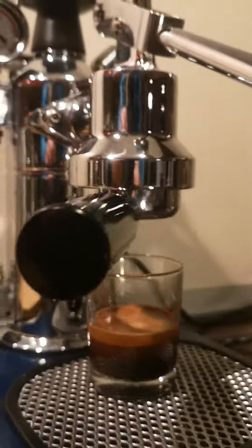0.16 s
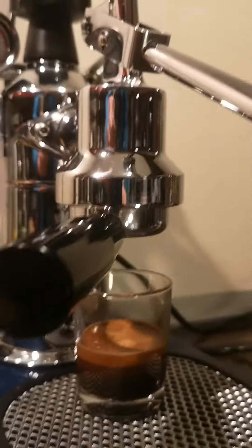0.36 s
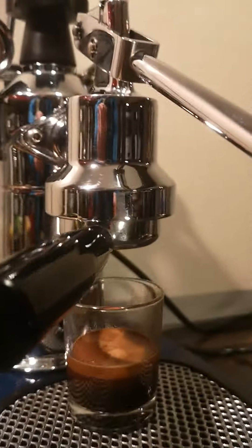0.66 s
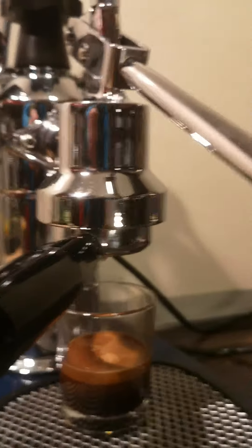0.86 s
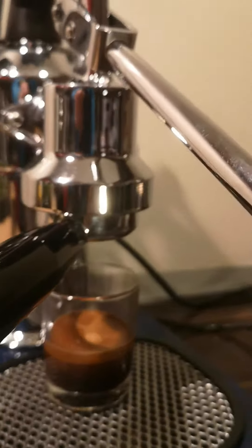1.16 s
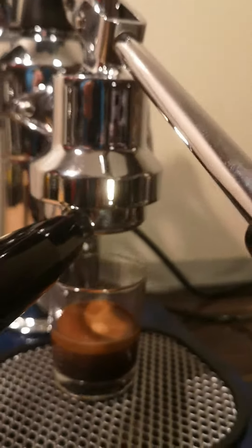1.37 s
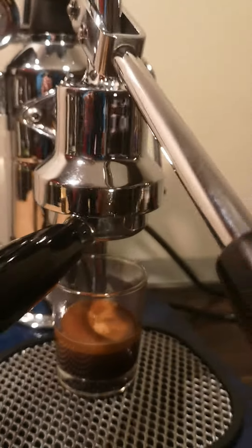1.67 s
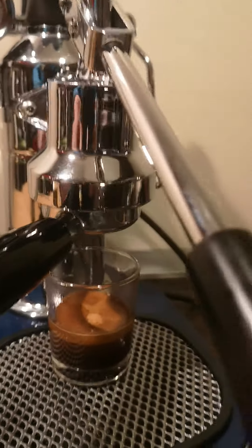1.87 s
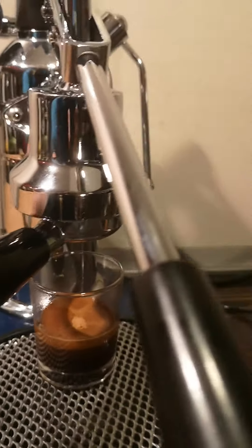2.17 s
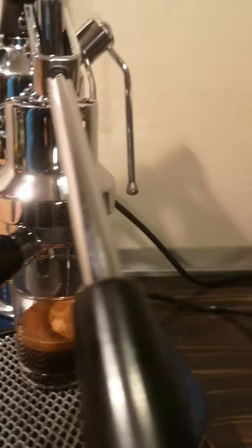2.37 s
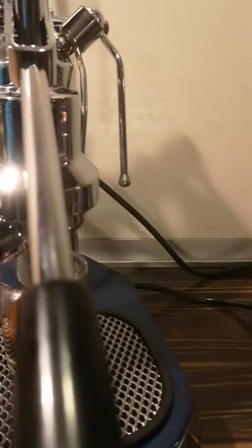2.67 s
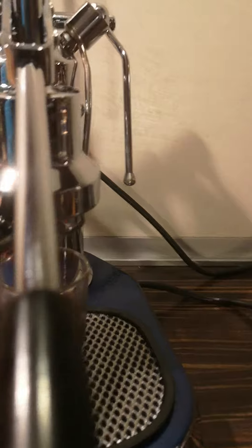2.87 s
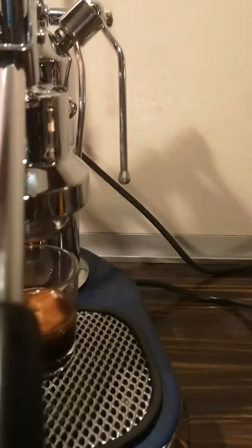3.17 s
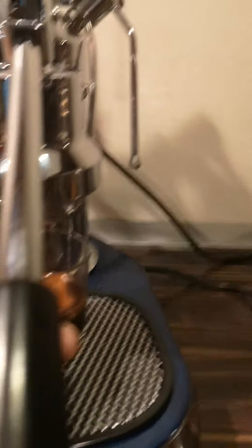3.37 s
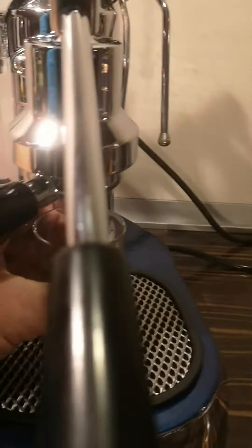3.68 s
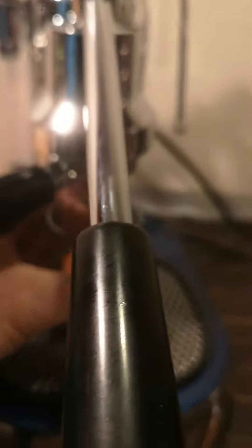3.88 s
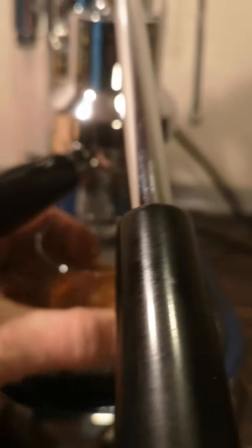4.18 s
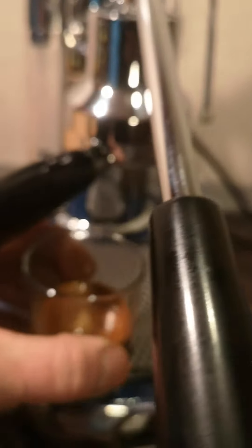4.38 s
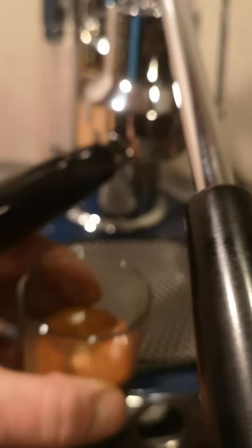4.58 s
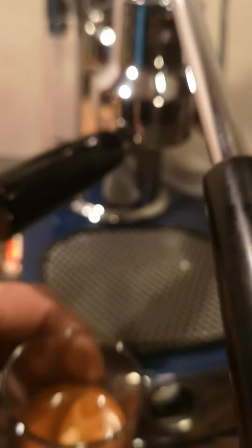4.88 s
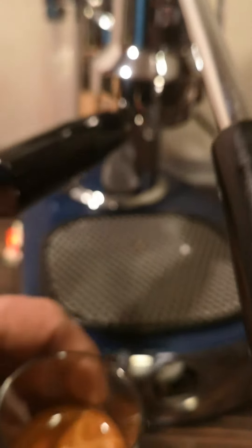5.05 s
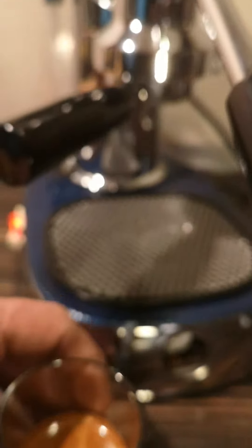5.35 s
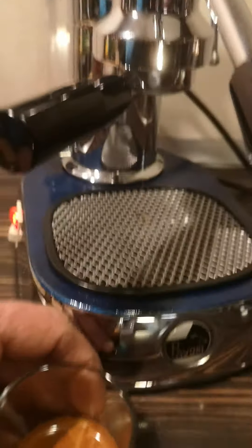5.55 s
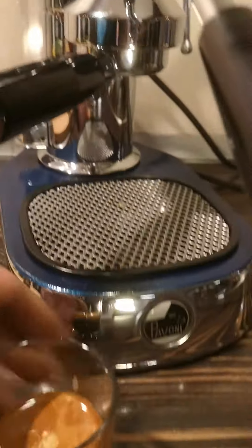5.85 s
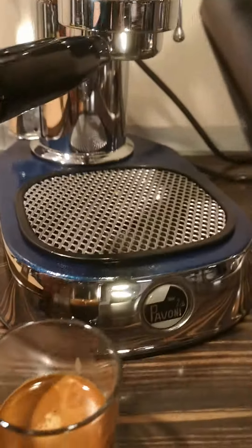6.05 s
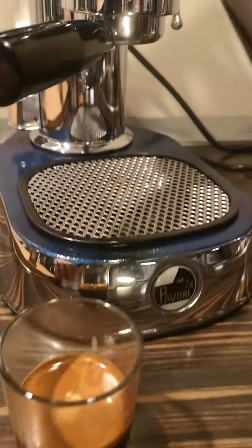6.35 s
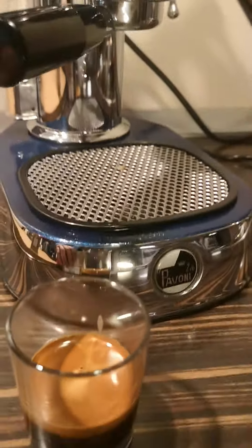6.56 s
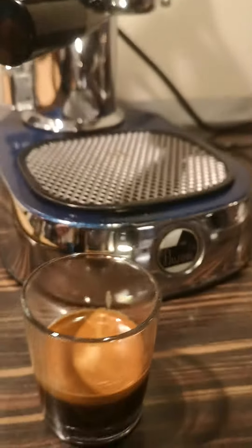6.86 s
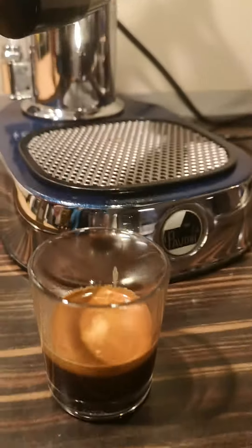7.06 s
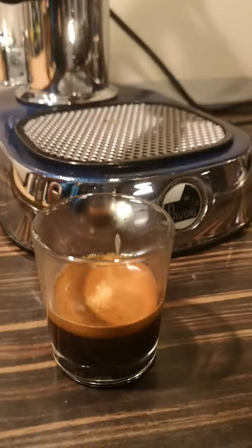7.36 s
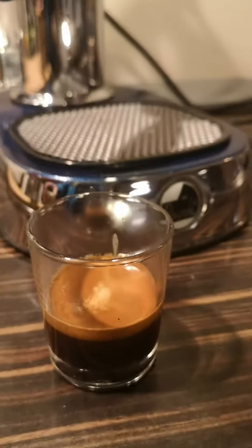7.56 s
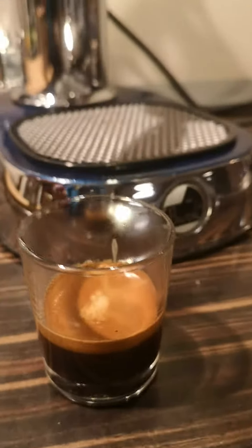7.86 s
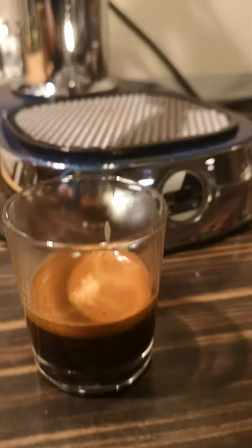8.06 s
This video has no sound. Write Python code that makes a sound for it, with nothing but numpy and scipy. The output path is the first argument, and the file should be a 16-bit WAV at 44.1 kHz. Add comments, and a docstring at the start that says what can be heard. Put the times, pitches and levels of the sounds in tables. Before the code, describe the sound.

Close handling ticks in a quiet room, a sleeve swish and sharp metallic snap, then a glass landing on wood with dull bumps after.

```python
"""Espresso glass set down on a wooden table

A small quiet room, heard through a phone's left and right microphone ports, with fingers close to the left one.
Fingers slide and tap on the case as filtered noise and short cracks; a sleeve swishes as hiss shaped by arm speed.
Metal snaps and small things click as the glass leaves a lever machine's metal drip tray: cracks, rings, low thuds.
The glass lands with a double knock over decaying table modes; a dry tick and dull bumps follow as the hand lets go."""
import sys
import numpy as np
from scipy import signal
from scipy.fft import rfft, irfft
from scipy.io import wavfile

SR = 44100
rng = np.random.default_rng(int(sys.argv[2]) if len(sys.argv) > 2 else 0)


def transcribe(signal):
    """Save signal, clipped to [-1, 1], as a 16-bit WAV file at the path in sys.argv[1]."""
    frames = np.atleast_2d(signal).T
    limited = np.clip(frames, -1, 1)
    pcm = np.round(limited * 32767).astype(np.int16)
    wavfile.write(sys.argv[1], SR, pcm)


N = 362618
T = np.arange(N) / SR
RING = T[:int(.6 * SR)]  # time axis of one short event, s


def undb(db):
    """Decibels to gain."""
    return 10 ** (np.asarray(db) / 20)


def unit(x):
    """Scale to rms 1."""
    return x / np.sqrt(np.mean(x ** 2))


def peak(x):
    """Scale to peak 1."""
    return x / np.abs(x).max()


def pan(db):
    """Left and right gains for a level difference, left minus right."""
    return undb(np.array([[db], [-db]]) / 2)


def add(out, s, x):
    """Mix a sound in at time s."""
    start = int(s * SR)
    x = x[..., max(-start, 0):N - start]
    first = max(start, 0)
    out[:, first:first + x.shape[-1]] += x


def at_freq(points, hz):
    """Read (Hz, value) points on a log-frequency axis."""
    f, value = np.transpose(points)
    return np.interp(np.log(np.maximum(hz, 1)), np.log(f), value)


def colour(x, points, tilt_db=0):
    """Minimum-phase filter of unit power gain through (Hz, dB) points, tilted per octave above 1 kHz."""
    size = 4096
    hz = np.arange(size // 2 + 1) * SR / size
    tilt = tilt_db * np.log2(np.maximum(hz, 1000))
    gain = unit(undb(at_freq(points, hz) + tilt))
    # folding the cepstrum onto positive times makes the filter causal
    cepstrum = irfft(np.log(gain))
    cepstrum[1:size // 2] *= 2
    cepstrum[size // 2 + 1:] = 0
    impulse = irfft(np.exp(rfft(cepstrum)))
    return signal.fftconvolve(np.atleast_2d(x), impulse[None], axes=1)[:, :x.shape[-1]]


def resonate(x, hz, q):
    """Two-pole resonance, gain 1 at its centre."""
    return signal.lfilter(*signal.iirpeak(hz, q, SR), x)


def fade(t60):
    """Exponential decay by 60 dB in t60 seconds."""
    return np.exp(-np.log(1000) * RING / t60)


def ring(modes):
    """Sum of decaying sines from (Hz, dB, t60 s) rows."""
    return sum(undb(db) * fade(t60) * np.sin(2 * np.pi * hz * RING) for hz, db, t60 in modes)


def soften(x, ms):
    """A contact that lasts longer excites less treble: smooth with a bell-shaped push."""
    push = np.exp(-.5 * (RING[:2048] * 4000 / ms - 2) ** 2)
    return signal.fftconvolve(np.atleast_2d(x), push[None] / push.sum(), axes=1)[:, :len(RING)]


def crack(t60, scatter_db, lag):
    """One impulse, reaching the left port lag s later, plus decaying scatter that differs at the two ports."""
    scatter = rng.standard_normal((2, len(RING))) * fade(t60)
    out = undb(scatter_db) * scatter / np.linalg.norm(scatter, axis=1, keepdims=True)
    out[0, int(max(lag, 0) * SR)] += 1
    out[1, int(max(-lag, 0) * SR)] += 1
    return out


# Small quiet room, how long each band lingers: freq_hz [Hz], t60_s [s]
ROOM_DECAY = [(100, 0.83), (400, 0.48), (1200, 0.35), (4000, 0.33), (8000, .36), (15000, 0.32)]


def room(x, wet_db):
    """Add the diffuse tail of a small room; the bass is alike at both ports."""
    build_s, split_hz = .008, 350
    hz = np.fft.rfftfreq(len(RING), 1 / SR)
    mid, side = rfft(rng.standard_normal((2, len(RING))))
    field = mid + np.array([[1], [-1]]) * side * np.minimum(hz / split_hz, 1)
    centres, t60s = np.transpose(ROOM_DECAY)
    tail = 0
    for share, t60 in zip(np.eye(len(t60s)), t60s):
        band = field * at_freq(np.c_[centres, share], hz)
        tail = tail + irfft(band, len(RING)) * fade(t60)
    tail = tail * (1 - np.exp(-RING / build_s))
    tail = tail / np.linalg.norm(tail[0])
    return x + undb(wet_db) * signal.fftconvolve(x, tail, axes=1)[:, :N]


# Fingers sliding on the case by the left port: start_s [s], length_s [s], level_db [dB], speed [0-1]
STROKES = [(-.03, 0.14, -41.5, 0.79), (0.144, 0.11, -58.5, 0.97), (0.611, 0.094, -53, 0.03),
           (0.704, 0.063, -63, 0.3), (.825, 0.048, -64.5, 0), (0.963, 0.093, -51.5, 0.08),
           (1.059, .23, -45.5, 0), (1.25, 0.18, -44.5, 0), (1.413, 0.034, -52.5, 0.1),
           (1.538, 0.12, -53, 0.34)]
# Skin on the case at the lowest and highest speed: freq_hz [Hz], relative_db [dB]
SLOW_RUB = [(300, -10.5), (850, -15), (1250, -12.5), (2100, -4.5), (2650, 0.5), (3400, -10.5), (4600, -2),
            (5600, -10.5), (7300, 1), (9300, -15.5), (11000, -30), (15000, -35)]
FAST_RUB = [(300, -33), (1400, -14.5), (2200, -3.5), (2900, -2.5), (4000, 3), (7800, 1.5), (10000, -20),
            (15000, -28)]


def finger_slides():
    """Skin slips over the case in countless tiny catches, right beside the left port."""
    grain, grain_hz, pan_db = .23, 700, 15
    out = np.zeros((2, N))
    for s, length, db, speed in STROKES:
        count = int(length * SR)
        strengths = np.exp(grain * rng.standard_normal(len(RING)))
        stick = strengths[(RING * grain_hz).astype(int)]  # each catch keeps its own strength
        catches = (rng.standard_normal((2, len(RING))) * stick)[:, :count]
        slow, fast = colour(catches, SLOW_RUB), colour(catches, FAST_RUB)
        near, other = unit((1 - speed) * slow + speed * fast)
        # the body of the phone shades the far port
        far = colour(other, [(800, 2), (2200, -6.5), (7000, -24.5), (14000, -9)])[0]
        ports = np.array([near, undb(-pan_db) * unit(far)])
        add(out, s, ports * undb(db) * signal.windows.tukey(count, .6))
    return out


# Rumble of the hand around the phone: freq_hz [Hz], relative_db [dB]
GRIP_RUMBLE = [(20, 6.5), (45, 3.5), (90, -6), (170, -12), (300, -28.5), (700, -47.5), (3000, -59.5)]
# The phone shifts in the hand: time_s [s], rumble_db [dB], half_length_s [s]
SHIFTS = [(1.4, -43, .08), (1.73, -46.5, .13), (2.3, -63, .5), (2.96, -54, .035), (3.45, -57, .12),
          (3.9, -61, .12), (7.7, -68, 1.1)]
GRIP_REST_DB = -80  # a hand held still


def grip_rumble():
    """The holding hand shifts and shakes both ports alike; each shift swells and ebbs."""
    shake = undb(GRIP_REST_DB)
    for s, db, half_s in SHIFTS:
        shake = shake + undb(db) * np.exp(-((T - s) / half_s) ** 2)
    return unit(colour(rng.standard_normal(N), GRIP_RUMBLE)) * shake


# Room tone of the small quiet room: freq_hz [Hz], relative_db [dB]
HUSH = [(20, 4), (45, -1.5), (100, -15), (200, -21), (400, -26.5), (700, -32), (1200, -28.5), (2300, -26.5),
        (3800, -32.5), (6500, -33), (7700, -30.5), (8500, -39.5), (11000, -43.5), (15500, -44.5)]
HUSH_DB, HUSH_RISE_DB_PER_S = -63.6, .3


def room_tone():
    """Faint hiss whose colour wanders slowly at random, over a low murmur of air that both ports share."""
    split_hz, wander_db = 250, -.4
    mid, side = colour(rng.standard_normal((2, N)), HUSH)
    side = signal.sosfilt(signal.butter(1, split_hz, "high", fs=SR, output="sos"), side)
    hiss = unit(np.array([mid + side, mid - side]))
    for hz in np.geomspace(2000, 8000, num=5):
        wander = np.interp(T, np.linspace(0, T[-1], num=20), rng.standard_normal(20))
        hiss = hiss + (undb(wander_db * wander) - 1) * resonate(hiss, hz, 7.7)
    return hiss * undb(HUSH_DB + HUSH_RISE_DB_PER_S * T)


# The grip slips once in a run of catches
CREAK_S, CREAK_HZ, CREAK_THUMP_DB, CREAK_TICK_DB, CREAK_TICK_HZ = 1.361, 115, -27, -26, 1800
CREAK_GAP_S, CREAK_SLOWING, CREAK_FADE_DB_PER_S = .0105, 1.22, 170


def creak(count=7):
    """Catches of a slipping grip, ever further apart and weaker, as rows like the taps."""
    gaps = CREAK_GAP_S * CREAK_SLOWING ** np.arange(count - 1)
    rows = []
    for delay in np.r_[0, np.cumsum(gaps)]:
        loss = CREAK_FADE_DB_PER_S * delay
        rows.append((CREAK_S + delay, CREAK_THUMP_DB - loss, CREAK_TICK_DB - loss, CREAK_TICK_HZ))
    return rows


# Faint catches at random while the phone is turned
TURN_START_S, TURN_LENGTH_S = 1.17, .68
TURN_THUMP_DB, TURN_TICK_DB, TURN_SPREAD_DB = -45, -47, 3


def faint_catches(count=12):
    """Small chance catches of the turning grip, as rows like the taps."""
    rows = []
    for when, size in rng.random((count, 2)):
        thump_db = TURN_THUMP_DB + TURN_SPREAD_DB * (2 * size - 1)
        rows.append((TURN_START_S + TURN_LENGTH_S * when, thump_db, TURN_TICK_DB, CREAK_TICK_HZ))
    return rows


# The grip catches and taps on the case: time_s [s], thump_db [dB], tick_db [dB], tick_resonance_hz [Hz]
TAPS = [(0.202, -53, -29.5, 1400), (0.658, -55, -35, 2900), (0.922, -52, -24, 2900),
        (0.939, -44, -24, 1100), (1.215, -26, -13, 2700), (1.2509, -27, -9, 3200), (1.3, -36, -11.5, 4000),
        (1.340, -27, -34, 1700), (1.3453, -34, -19.5, 2400), (1.544, -35, -39, 7000),
        (1.576, -30.5, -44, 1700), (1.5842, -24.5, -26, 1900), (1.592, -33, -34, 1700),
        (1.621, -29, -34, 1600), (1.6429, -28, -28.5, 1650), (1.7356, -24, -30, 7000),
        (1.7618, -31, -33, 6500), (1.864, -38, -42, 2100), (1.9028, -33, -40.5, 1850),
        (5.856, -36.5, -47, 1000), (6.186, -30.5, -42.5, 2200), (6.507, -40, -54, 2400)]
# A tick at the near port: freq_hz [Hz], relative_db [dB]
TICK = [(200, 3.5), (450, 0), (700, -4), (1000, 2.5), (1500, -7), (2400, 2), (3700, -4), (5000, -12),
        (7500, -5.5), (10000, -21.5), (15000, -34.5)]
CASE_HZ = 155  # thump note of the taps and faint catches
FLEX_PER_TICK = .22  # dB of extra flexing for each dB by which the tick outweighs the thump


def case_taps():
    """Each catch ticks at the near port and thumps the whole case; the case also flexes, mostly under the finger."""
    thump_t60, thump_pan_db, contact_ms = .026, .4, .83
    far_db, resonance_db, q = -14, 6, 2.2
    flex_db, flex_hz, flex_t60, flex_far = -7, 325, .018, -.69  # the far port flexes in opposite phase
    out = np.zeros((2, N))
    for catches, hz in [(TAPS + faint_catches(), CASE_HZ), (creak(), CREAK_HZ)]:
        for s, thump_db, tick_db, tick_hz in catches:
            tick = colour(crack(.005, -7, -.0005), TICK)
            tick = peak(tick + undb(resonance_db) * resonate(tick, tick_hz, q))
            add(out, s, undb(tick_db) * tick * undb([[0], [far_db]]))
            flex_level = thump_db + flex_db + FLEX_PER_TICK * (tick_db - thump_db)
            flex = np.array([[1], [flex_far]]) * ring([(flex_hz, flex_level, flex_t60)])
            thump = pan(thump_pan_db) * ring([(hz, thump_db, thump_t60)])
            add(out, s, -soften(thump + flex, contact_ms))
    return room(out, -19)


SWISH_FALL = 1.5  # a movement dies away with this power of time


def swish(movement, spectrum, pan_db, resonances=()):
    """Fibres brush past each other as fast as the arm moves: it gathers speed, then coasts to rest."""
    grain = .31
    _, db, attack_s, release_s = movement
    t = T[:SR]
    fibres = rng.standard_normal((2, SR)) * np.exp(grain * rng.standard_normal(SR))
    hiss = unit(colour(fibres, spectrum))
    for hz, width, peak_db in resonances:
        band = resonate(rng.standard_normal(fibres.shape), hz, hz / width)
        hiss = hiss + undb(peak_db) * unit(band)
    rise = np.sin(np.pi / 2 * np.minimum(t / attack_s, 1)) ** 2
    coast = np.hypot(1, np.maximum(t - attack_s, 0) / release_s) ** SWISH_FALL
    speed = rise / coast
    return unit(hiss) * undb(db) * speed * (1 - t ** 2) * pan(pan_db)


# The arm reaching out: fastest_s [s], level_db [dB], attack_s [s], release_s [s]
REACH = (2.77, -44.8, .245, .068)
# The cuff brushing by: fastest_s [s], level_db [dB], attack_s [s], release_s [s]
CUFF_SWISHES = [(6.585, -56.5, .08, .035), (7.468, -53.5, .014, .06), (7.865, -51, .06, .026)]
# Cloth of arm and cuff: freq_hz [Hz], relative_db [dB]
ARM_CLOTH = [(100, -19), (220, -7), (400, -5.5), (600, -12.5), (1000, -13.5), (1400, -10), (1950, 2.5),
             (2300, -3), (3000, 1), (3550, -15), (4500, 2.5), (6000, -5.5), (7700, -2), (10500, -30),
             (15000, -24)]
CUFF_CLOTH = [(180, -51), (300, -7.5), (726, -16.5), (1310, -4), (1490, -4), (1650, -1.5), (2560, -2),
              (4390, -10.5), (6620, -11), (15000, -31.5)]
# Narrow bands in the arm's hiss: freq_hz [Hz], width_hz [Hz], relative_db [dB]
ARM_RESONANCES = [(2590, 170, -5), (4210, 120, -5)]


def sleeve():
    """The arm reaches for the glass; later the cuff brushes by as the hand withdraws."""
    out = np.zeros((2, N))
    add(out, REACH[0] - REACH[2], swish(REACH, ARM_CLOTH, 5.5, ARM_RESONANCES))
    for movement in CUFF_SWISHES:
        add(out, movement[0] - movement[2], swish(movement, CUFF_CLOTH, -.45))
    return out


# A sharp metallic snap: time_s [s], peak_db [dB], tilt_db [dB per octave above 1 kHz]
SNAPS = [(2.7494, -14, 5), (2.7504, -18, 1.5)]
# Its crack: freq_hz [Hz], relative_db [dB]
SNAP_SPECTRUM = [(150, -31), (900, -11), (1250, 3), (1600, 8.5), (2300, 1), (2800, -5), (3500, -11),
                 (4250, -9), (4700, 2), (5300, -9), (5800, -10), (6500, -14), (8100, -12.5), (8900, -13),
                 (9400, -26), (11300, -19.5), (15000, -33)]
# Its ringing metal, relative to each crack: freq_hz [Hz], level_db [dB], t60_s [s]
SNAP_MODES = [(1346, -34, 0.3), (1486, -25.5, 0.17), (1606, -24, .16), (4460, -50, 0.27), (4600, -45, .15),
              (7920, -18, 0.04)]


def snap():
    """Metal catches twice in quick succession and rings."""
    out = np.zeros((2, N))
    for s, db, tilt_db in SNAPS:
        click = colour(crack(.041, 12, -.00025), SNAP_SPECTRUM, tilt_db)
        add(out, s, undb(db) * (peak(click) + ring(SNAP_MODES)))
    return room(out, -12.5)


# A fingertip peels off the glass: time_s [s], level_db [dB], pitch_hz [Hz], t60_s [s]
JUDDERS = [(6.588, -30, 110, .08)]
# The machine's hollow base answers contacts on the tray, the duller ones more strongly
BASE_HZ, BASE_T60_S, BASE_DB, BASE_DB_PER_TILT = 188, .28, -16, 3.8
SNAP_THUD_DB = -48
HOLLOW_HZ, HOLLOW_T60_S, HOLLOW_DB = 324, .22, -41.5  # the table's hollow note under the first bump


def thuds():
    """Contacts set the hollow base and table sounding, a fingertip judders; each low note swells quickly and dies."""
    rise_s, side_db, q = .0046, -6, 2.9
    onset = 1 - np.exp(-(RING / rise_s) ** 2)
    out = np.zeros((2, N))
    notes = [(SNAPS[0][0], SNAP_THUD_DB, BASE_HZ, BASE_T60_S),
             (BUMPS[0][0], HOLLOW_DB, HOLLOW_HZ, HOLLOW_T60_S)]
    for s, db, tilt_db in CLICKS:
        if s < LIFTED_S:
            notes.append((s, db + BASE_DB - BASE_DB_PER_TILT * tilt_db, BASE_HZ, BASE_T60_S))
    for s, db, hz, t60 in notes:
        excitation = rng.standard_normal((2, len(RING))) * fade(t60) * onset
        mid, side = resonate(resonate(excitation, hz, q), hz, q)
        add(out, s, undb(db) * peak(mid + undb(side_db) * side * np.array([[1], [-1]])))
    for s, db, hz, t60 in JUDDERS:
        add(out, s, ring([(hz, db, t60)]) * onset)
    return room(out, -18.5)


# Small hard contacts of fingers and glass: time_s [s], peak_db [dB before panning],
# tilt_db [dB per octave above 1 kHz]
CLICKS = [(3.265, -33.5, 2.3), (3.551, -44.5, -1.5), (3.5771, -36, 0), (3.798, -43.5, -1.5),
          (3.843, -47.5, -3.5), (3.927, -47.5, -.5), (4.377, -47.5, -.8), (5.4443, -40.5, 3),
          (5.906, -48, 2.5), (6.503, -39.5, -2), (6.512, -44, -2), (6.544, -44, -2), (6.569, -31.5, -1.5),
          (6.748, -50, 4), (7.465, -33.5, -7), (7.518, -39.5, -5), (7.633, -44, -7)]
# A click: freq_hz [Hz], relative_db [dB]
CLICK_SPECTRUM = [(150, -7.5), (600, -13), (1100, -4.5), (1500, -4.5), (2100, 0.5), (2900, -2.5),
                  (3600, -9), (4500, -7), (5600, -3.5), (7700, -7.5), (9600, -21), (15000, -26)]
# A contact before the glass is lifted away, and after: rattle_t60_s [s], resonance_hz [Hz at zero tilt],
# left_minus_right_db [dB]
ON_TRAY = (.085, 2100, 3)
ON_TABLE = (.035, 3000, -6)
LIFTED_S = 5
CLICK_TILT_PER_OCTAVE = 8  # a click this much brighter (dB per octave) rings an octave higher


def clicks():
    """Hard little contacts, longer on the metal tray than on the wood; a longer rattle has more scatter."""
    scatter_db, pivot_t60 = 3, .013  # scatter level of a rattle this long
    resonance_db, q = 5, 7
    out = np.zeros((2, N))
    for s, db, tilt_db in CLICKS:
        t60, hz, pan_db = ON_TRAY if s < LIFTED_S else ON_TABLE
        hz = hz * 2 ** (tilt_db / CLICK_TILT_PER_OCTAVE)
        rattle = crack(t60, scatter_db + 10 * np.log10(t60 / pivot_t60), .0003)
        click = colour(rattle, CLICK_SPECTRUM, tilt_db)
        click = peak(click + undb(resonance_db) * resonate(click, hz, q))
        add(out, s, undb(db) * pan(pan_db) * click)
    return room(out, -10)


# The glass lands on one edge, then flat: time_s [s], peak_db [dB before softening], contact_ms [ms]
LANDINGS = [(5.6544, -10.5, .06), (5.6624, -15.5, 0.088)]
# Glass on the table top, relative to the body level: freq_hz [Hz], level_db [dB], t60_s [s]
TABLE_MODES = [(113, -18, 0.18), (166, -10.5, .22), (207, -18, .25), (291, -17.5, .16), (504, -23, 0.14),
               (601, -19.5, 0.1), (730, -28, .18), (843, -29.5, 0.37), (887, -31.5, .2), (952, -16, .2),
               (944, -15.5, .22), (1136, -14.5, .18), (1204, -17, .26), (1340, -25.5, .22),
               (1433, -12, 0.15), (1663, -12, 0.14), (1790, -26, .2), (1860, -15.5, .18), (2110, -19, 0.13)]
# The knock on wood: freq_hz [Hz], relative_db [dB]
KNOCK_SPECTRUM = [(80, -9), (140, -2.5), (350, -15), (700, -13), (1000, 3), (1400, 1.5), (2100, -3),
                  (2600, -19.5), (3500, -14.5), (4300, -34.5), (5000, -28), (7500, -25.5), (10000, -44),
                  (15000, -40)]


def glass_landing():
    """The thick base knocks twice on the wood; table top and glass ring briefly."""
    body_db, pan_db = -8, -.5
    knocks, body = np.zeros((2, 2, N))
    for s, db, ms in LANDINGS:
        knock = colour(crack(.04, 4, .0003), KNOCK_SPECTRUM)
        add(knocks, s, undb(db) * soften(pan(pan_db) * peak(knock), ms))
        add(body, s, undb(db + body_db) * pan(-1) * ring(TABLE_MODES))
    return room(knocks, -4.5) + body


# The glass is nudged and its base ticks once on the wood: time_s [s], peak_db [dB before panning]
NUDGES = [(7.169, -20)]
# That tick: freq_hz [Hz], relative_db [dB]
NUDGE_SPECTRUM = [(200, -9), (750, -14), (1400, 4), (2300, 3.5), (3000, -2), (4400, -10), (5500, -2),
                  (7000, -20), (8500, -10), (9500, -19), (15000, -21.5)]


def glass_nudge():
    """The nudged glass makes a single hard contact, with a room echo thinned around 5 kHz."""
    direct = np.zeros((2, N))
    for s, db in NUDGES:
        tick = colour(crack(.054, -3, .00033), NUDGE_SPECTRUM)
        add(direct, s, undb(db) * pan(-2.9) * peak(tick))
    echo = room(direct, -5) - direct
    return direct + colour(echo, [(1000, 2.5), (2500, -2.5), (5000, -8), (15000, 1.5)]) / 2


# The hand bumps the table as it lets go: time_s [s], level_db [dB], contact_ms [ms], both of the first push
BUMPS = [(7.464, -33.3, 3.15), (7.606, -38.5, 9)]
# The table's lowest modes: freq_hz [Hz], relative_db [dB], t60_s [s]
BUMP_MODES = [(46, 6, .14), (107, -5.5, 0.21), (175, 10, 0.11), (277, 8, 0.058), (440, 7.5, 0.083)]
REBOUND_S, REBOUND_DB, REBOUND_SOFTER_MS = .022, -1.2, 2.3  # change at each rebound


def bumps(count=3):
    """Soft pushes rebound, weaker and softer each time, and rock the table in its lowest modes."""
    out = np.zeros((2, N))
    for s, db, ms in BUMPS:
        for k in range(count):
            push = soften(ring(BUMP_MODES), ms + k * REBOUND_SOFTER_MS)
            add(out, s + k * REBOUND_S, undb(db + k * REBOUND_DB) * push)
    return room(out, -23)


def scene():
    """All sources at the two ports."""
    phone = finger_slides() + case_taps() + grip_rumble()
    glass = glass_landing() + glass_nudge() + clicks()
    return phone + glass + sleeve() + snap() + thuds() + bumps() + room_tone()


TOP_HZ = 15700


def record(dry):
    """The phone's microphones drop the deepest bass and cut the top."""
    dry = signal.sosfilt(signal.butter(1, 15, "high", fs=SR, output="sos"), dry)
    return signal.sosfilt(signal.ellip(8, .2, 70, TOP_HZ, fs=SR, output="sos"), dry)


dry = scene()
out = record(dry)
transcribe(out)
```